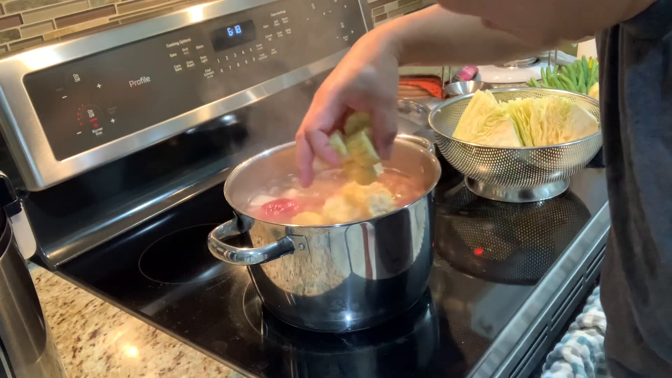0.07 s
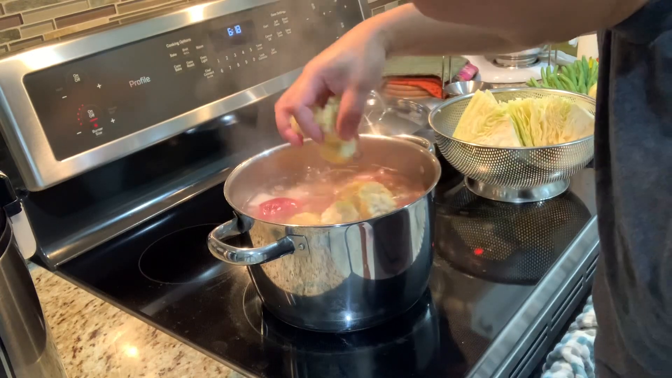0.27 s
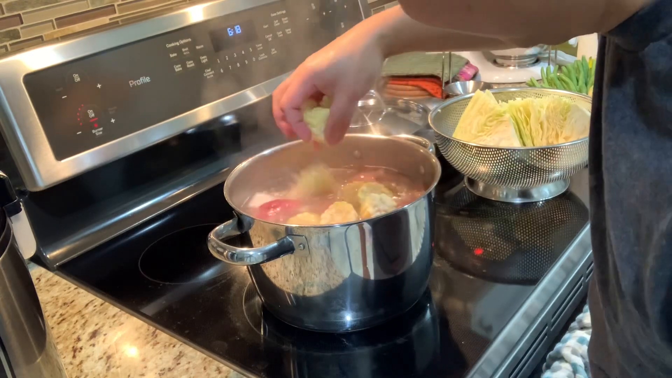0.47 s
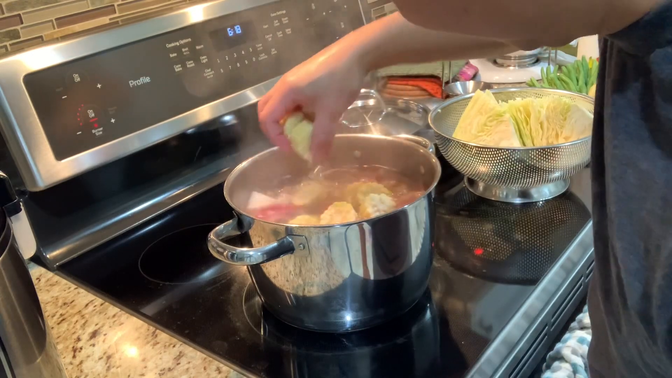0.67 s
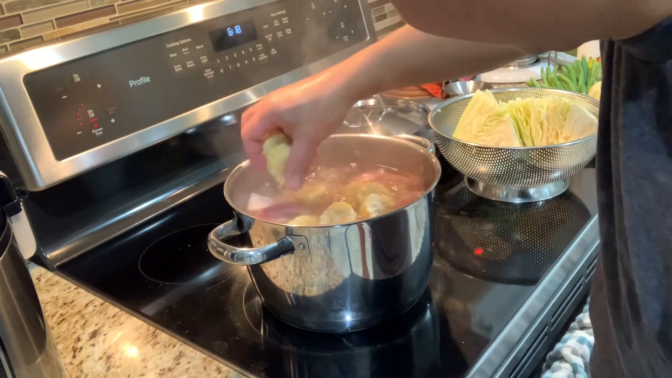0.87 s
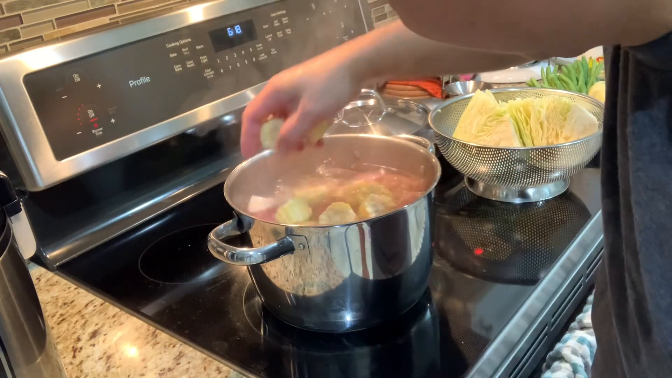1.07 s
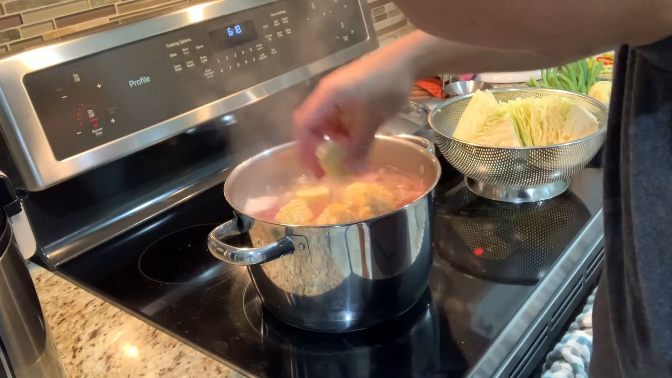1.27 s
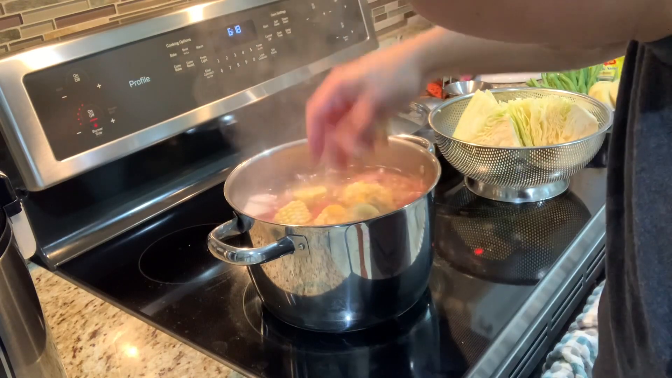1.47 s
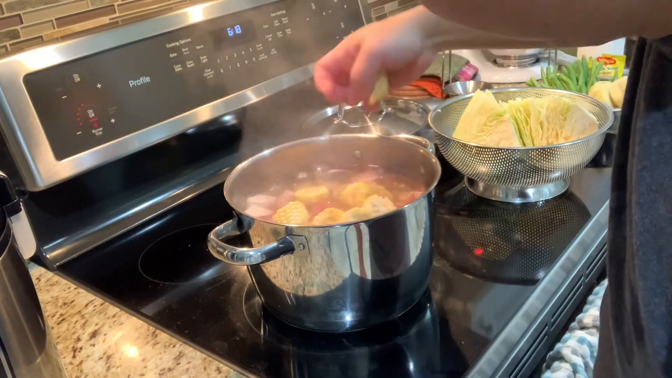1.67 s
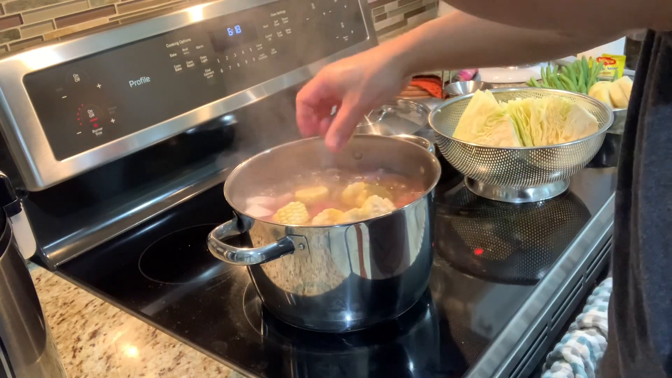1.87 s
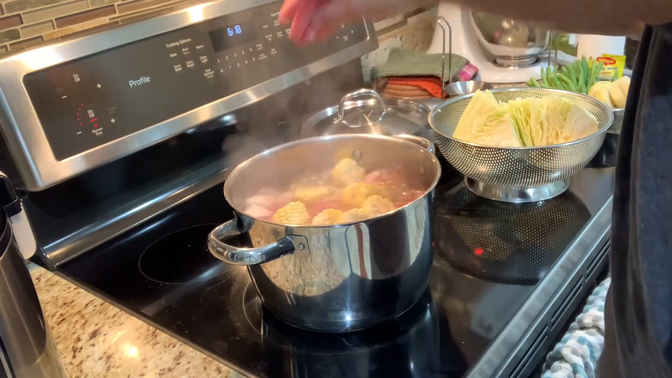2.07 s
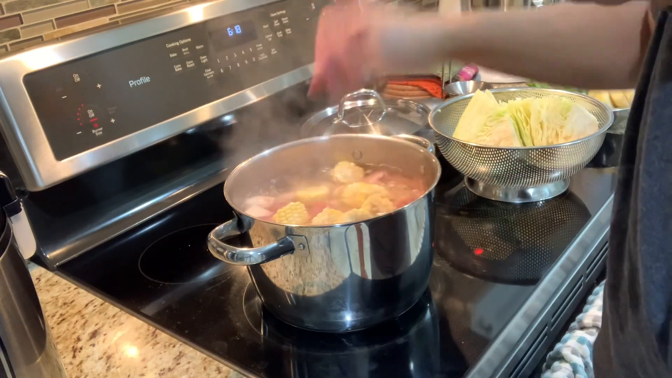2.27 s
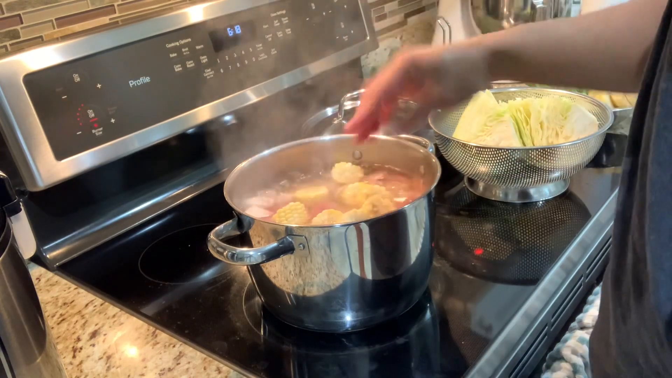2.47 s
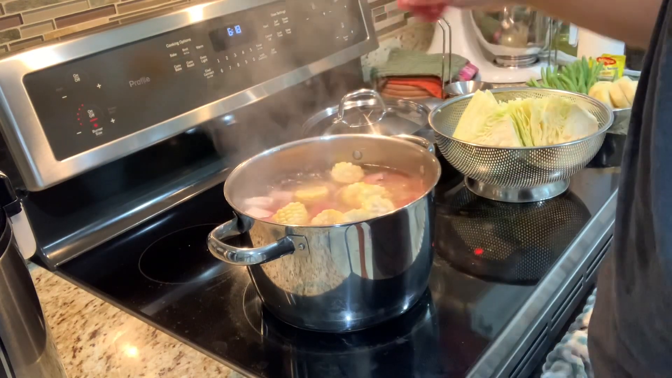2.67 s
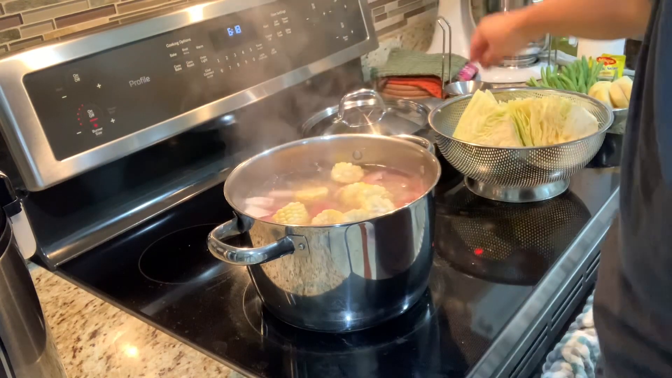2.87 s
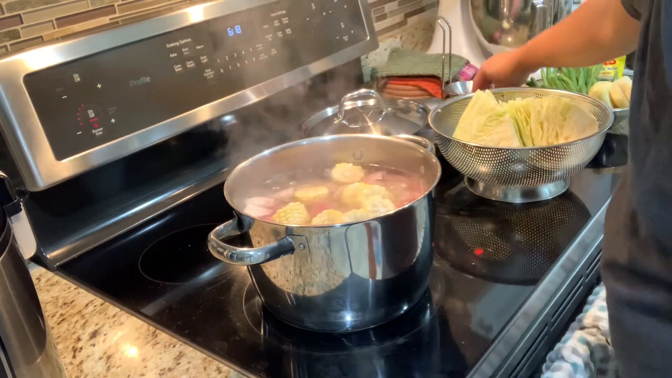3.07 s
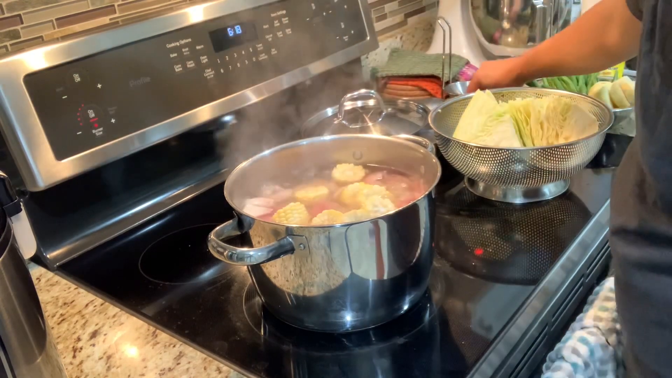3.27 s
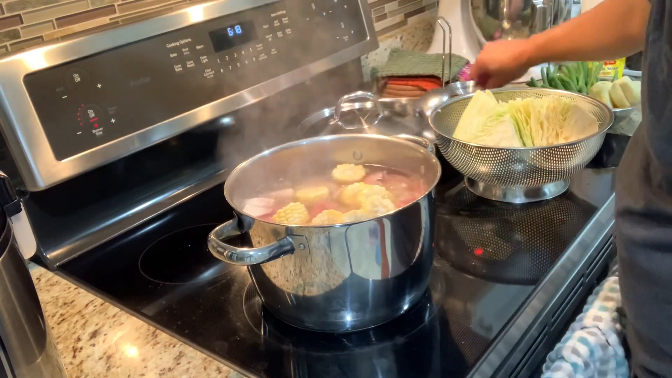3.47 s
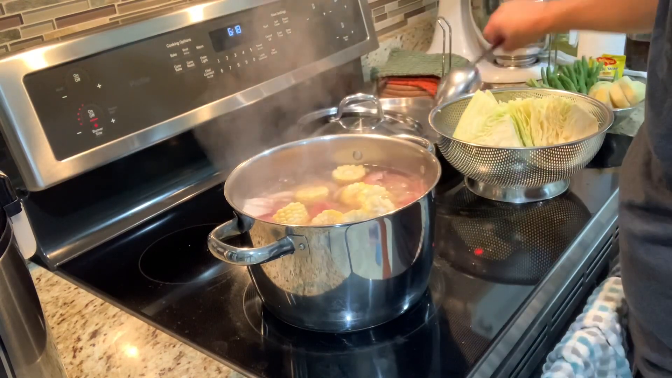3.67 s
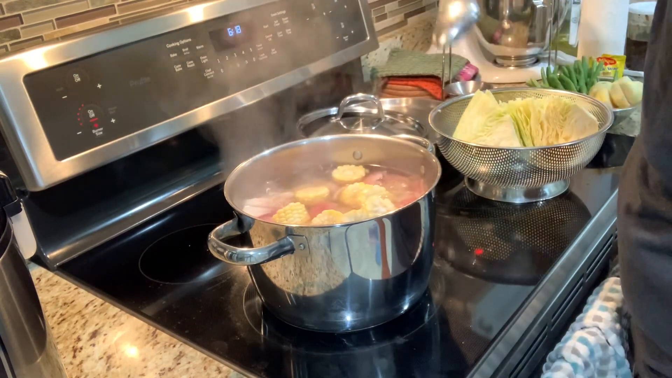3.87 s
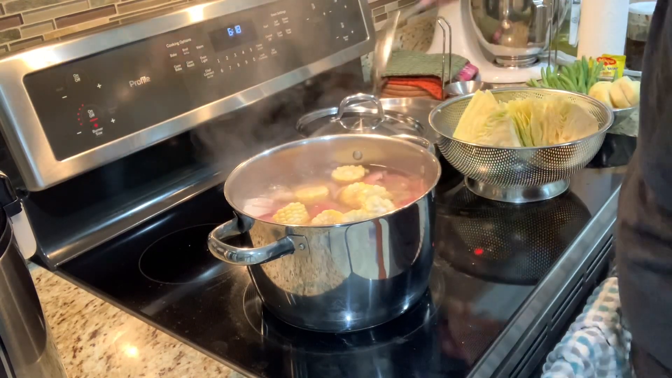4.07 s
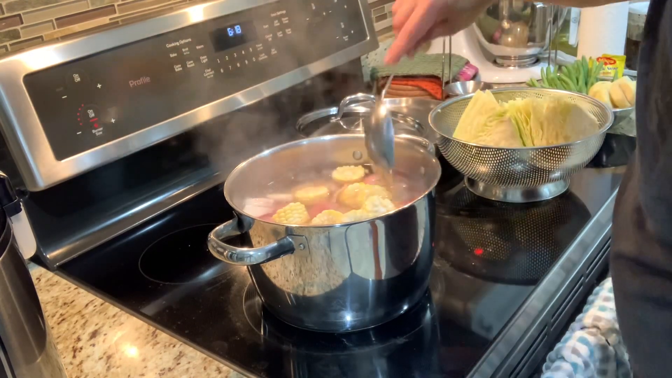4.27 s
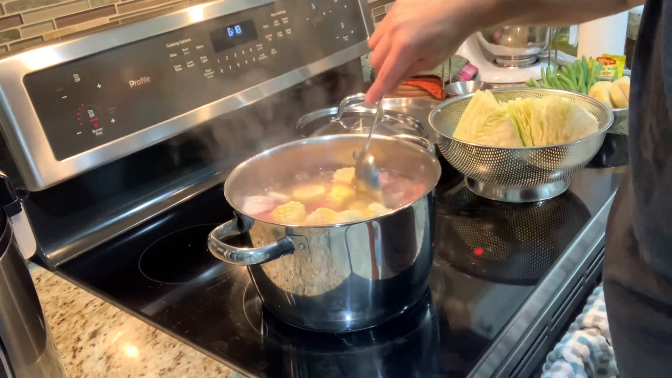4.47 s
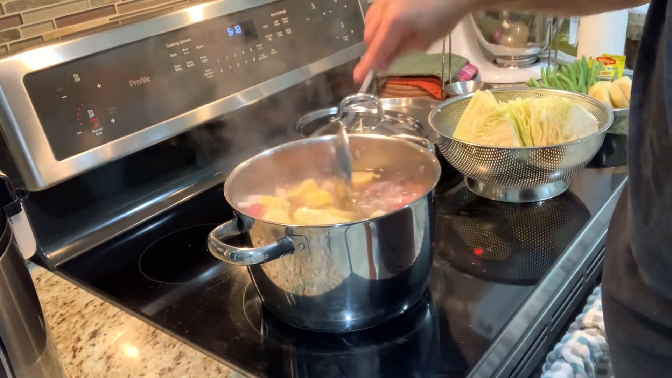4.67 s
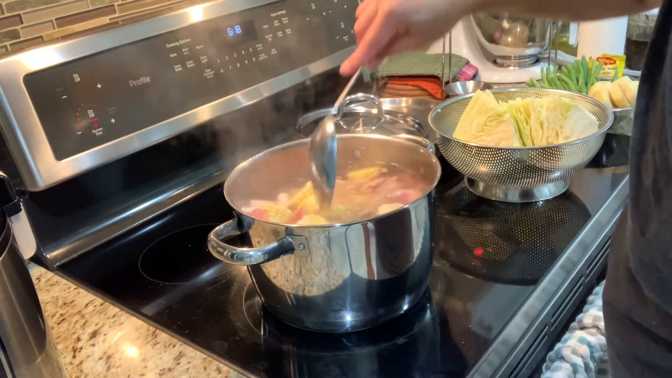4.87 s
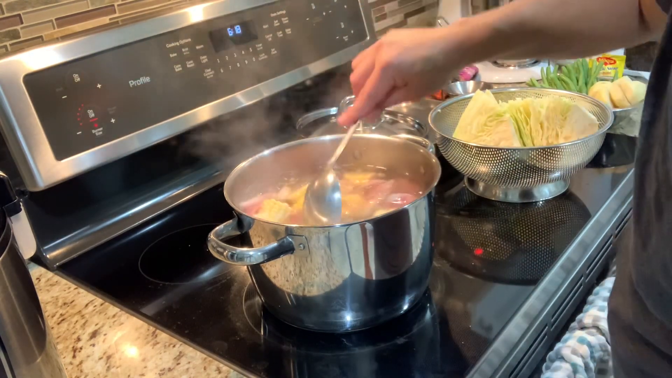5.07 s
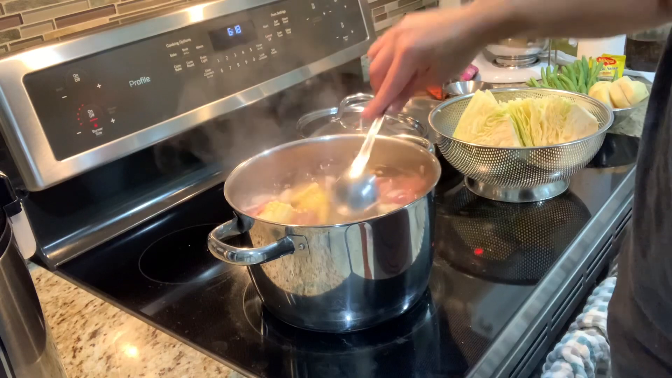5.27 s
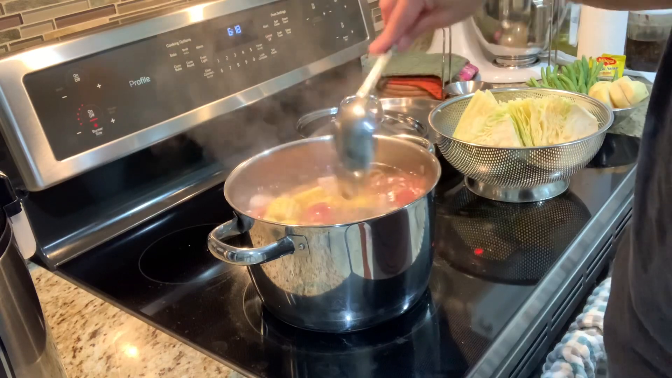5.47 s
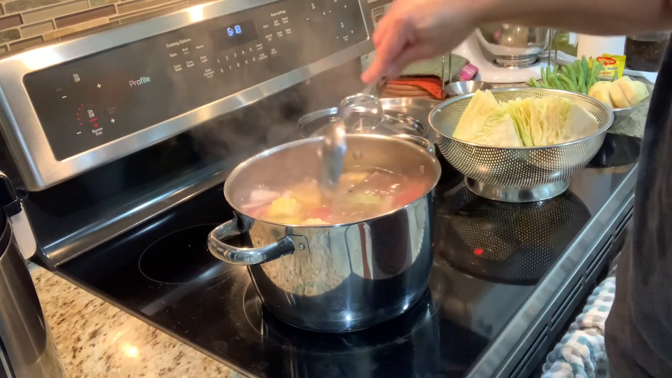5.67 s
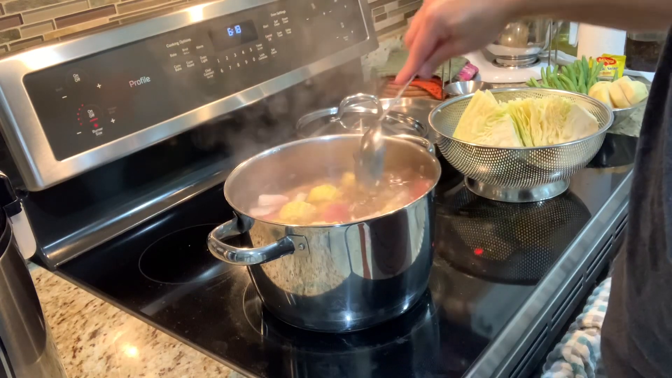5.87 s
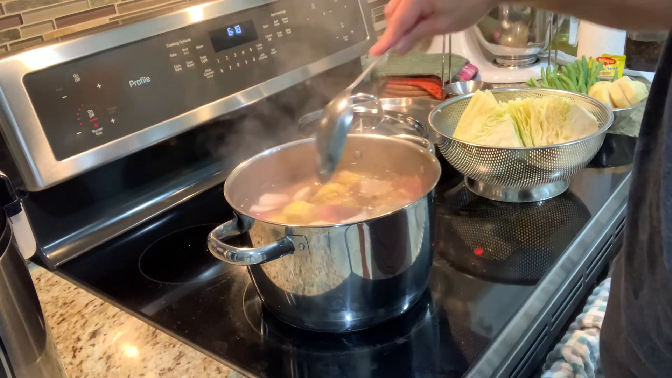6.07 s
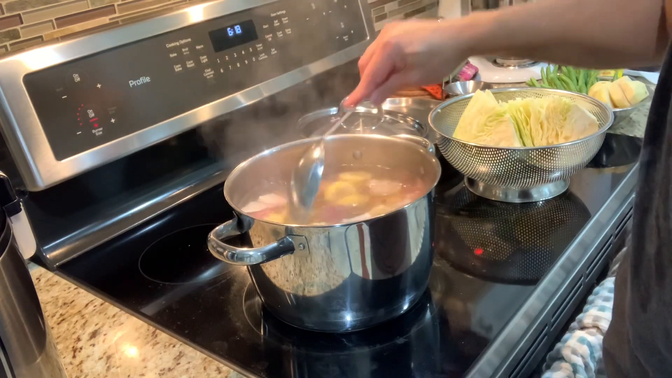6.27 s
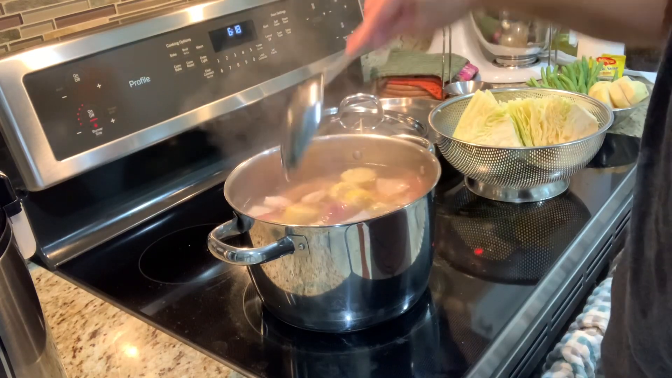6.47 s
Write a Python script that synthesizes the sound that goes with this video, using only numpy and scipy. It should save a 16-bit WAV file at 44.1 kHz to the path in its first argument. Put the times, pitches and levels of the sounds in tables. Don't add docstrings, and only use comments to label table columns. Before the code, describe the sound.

Close in a hard-walled kitchen, a pot of broth rolls softly with low rumble, fizz and tiny ticking bubbles. Corn pieces plop in with small splashes, strongest just before two seconds. A steel ladle then scrapes squealing along a stone counter and clatters very loudly, its brief ring echoing. Stirring follows with faint gurgles, drips and light splashes over a quiet appliance hum.

```python
import sys
import numpy as np
from scipy import signal
from scipy.fft import rfft, irfft, next_fast_len
from scipy.io import wavfile
from scipy.ndimage import uniform_filter1d

SR = 44100
rng = np.random.default_rng(int(sys.argv[2]) if len(sys.argv) > 2 else 0)


def attenuation_scalar(level_db):
    decades = np.asarray(level_db, float) / 20
    return 10 ** decades


def store_wav(level_fs):
    pcm = np.round(np.clip(np.atleast_2d(level_fs), -1, 1) * 32767)
    wavfile.write(sys.argv[1], SR, pcm.T.astype(np.int16))


N = 287158
T = np.arange(N) / SR

# pitch_hz [Hz], level_db [dB per Hz]
RUMBLE = [(12, -52), (20, -24), (49, 3), (92, -1), (141, 3.5), (157, 4.5), (173, -2), (265, -14),
          (461, -28.5), (500, -19), (650, -50.5), (1100, -120)]
SLOSH = [(120, -37.5), (200, -6.5), (269, 2), (402, -9.5), (507, -12), (878, -19.5), (2500, -36.5),
         (3250, -64), (5500, -120)]
PLUNGE = [(300, -15.5), (550, -4), (1100, 2.5), (2200, -1), (3300, -21), (5000, -59.5)]
SPRAY = [(1530, -22.5), (2600, -6), (2840, -4), (5050, -1.5), (6260, -4.5), (8000, -10.5), (10400, -11.5),
         (17600, -120)]
FIZZ = [(3530, -50), (6000, -5), (7900, -9), (10300, -3.5), (12700, -1.5), (14700, -6), (15400, -9.5),
        (16000, -21.5)]
# start_s [s], level_db [dB]
BOIL = [
    [(0.0, -58.5), (0.75, -70), (1.52, -67), (1.57, -76), (1.96, -61), (2.32, -64.5), (2.42, -59.5),
     (2.68, -72.5), (3.12, -66.5)],
    [(4.0, -80), (4.01, -68), (4.5, -62.5), (4.69, -75), (4.78, -60.5), (5.49, -69), (5.58, -60.5),
     (5.81, -71.5), (6.51, -64.5)],
]
# start_s [s], spray level_db [dB], mist_db above the spray [dB], depth_db [dB], t60_s [s]
SPLASHES = [(0.001, -66.5, -21, -5, 1), (0.3559, -50, 2, -3, 0.39), (0.431, -56.5, 0, -3, 0.22),
            (0.74, -68, -1, -8, 0.8), (0.8749, -52, -17, 1, 0.32), (0.937, -51.5, -6.5, 0, 0.23),
            (1.08, -54.5, -2.5, -33, 0.11), (1.335, -47.5, 1, -1.5, 0.15), (1.401, -55, 0, -9, 0.1),
            (1.726, -56.5, -8, 2, 0.12), (1.773, -53, 1.5, -2, 0.12), (1.842, -44.5, 2.5, -2, 0.26),
            (1.856, -42, 2, -2, 0.12), (1.924, -48.5, -1, -8.5, 0.21), (2.14, -74.5, 12, 5, 0.57),
            (2.443, -51.5, -18, -40, 0.061), (2.7, -55, -1.5, -11, 0.17), (2.7681, -62, -3, -31, 0.17),
            (2.191, -80, -15, 10.5, 0.73), (2.28, -76.5, -5, 2, 0.61), (2.8, -62, -17, -30, .2),
            (3.001, -60, -19, -4, 0.64), (3.024, -51, -17, -5, 0.6), (4.113, -63.5, 4.5, -15, 0.23),
            (4.1925, -64, 5.5, -14.5, 0.19), (4.265, -62, 0, -8, .2), (4.325, -58.5, -4, -8, 0.17),
            (4.363, -55.5, -6, -6, 0.25), (4.415, -62, -5, -9.5, .1), (5.1579, -55.5, -10.5, -23, 0.31),
            (5.368, -60.5, -27, -22.5, 0.32), (5.46, -59, -25.5, 3, 0.46), (5.5, -62, -27.5, 1, 0.28),
            (5.7007, -44.5, -3.5, -21, 0.24), (5.73, -58.5, 4, -7, 0.26), (5.847, -73.5, -20, 10.5, .15),
            (6.322, -70, 0, 0, 0.086)]
# start_s [s], level_db [dB]
FROTH = [
    (0.172, -52),
    (4.5168, -62.5),
    (4.7, -62.5),
    (4.7909, -53.5),
    (5.089, -62),
    (5.896, -58),
    (6.109, -60),
    (6.4192, -59),
]
# start_s [s], peak level_db [dB], pitch_hz [Hz]
TICKS = [(0.161, -56, 10500), (0.1805, -49.5, 14000), (0.191, -47.5, 13700), (0.255, -48, 10400),
         (0.3594, -36, 13360), (0.4299, -48, 10600), (0.5506, -49, 12860), (0.6615, -50, 11900),
         (0.7377, -52, 12200), (0.7592, -48, 13800), (0.7934, -53, 9370), (0.8124, -46.5, 11200),
         (0.831, -50.5, 13280), (0.9098, -51, 5290), (0.9453, -46, 6780), (0.9704, -41.5, 10300),
         (1.0246, -50.5, 14000), (1.0369, -43.5, 10400), (1.0819, -44, 11600), (1.1136, -47, 12400),
         (1.2137, -53, 8050), (1.2511, -55, 12900), (1.3293, -53, 11040), (1.3389, -46, 5600),
         (1.338, -43, 11500), (1.4032, -46.5, 6230), (1.4771, -52, 13000), (1.5783, -53.5, 13800),
         (1.6063, -57, 13300), (1.6187, -53, 12000), (1.6751, -45.5, 11900), (1.709, -45, 10000),
         (1.7445, -41.5, 12900), (1.7755, -36, 13290), (1.8442, -38, 11000), (1.8587, -39, 13100),
         (1.8583, -31, 6660), (1.9258, -39.5, 6400), (2.0577, -64, 13200), (2.0717, -47, 11600),
         (2.1032, -50.5, 10600), (2.12, -48.5, 12900), (2.1432, -48, 11400), (2.173, -53.5, 12200),
         (2.2248, -51.5, 11800), (2.2982, -58, 11700), (2.2986, -54.5, 12700), (2.3521, -50.5, 14250),
         (2.4543, -61, 9450), (2.4543, -47, 10400), (2.614, -72, 9270), (2.614, -52, 13300),
         (2.6468, -51, 12670), (2.7077, -60, 13800), (2.7097, -53, 13290), (2.7697, -48.5, 9400),
         (2.837, -49, 8480), (2.9986, -57, 12810), (3.026, -51, 5047), (3.1162, -46.5, 12030)]
# start_s [s], peak level_db [dB], pitch_hz [Hz]
STIR_TICKS = [(4.1172, -59.5, 8330), (4.1691, -58, 12600), (4.1947, -52, 10500), (4.2403, -58, 10300),
              (4.3357, -51, 12720), (4.363, -52, 5590), (4.4224, -56, 11300), (4.5155, -50.5, 10400),
              (4.545, -46, 10790), (4.6615, -48, 12610), (4.702, -54, 12480), (4.7884, -48.5, 12200),
              (4.838, -55, 11270), (5.0426, -51.5, 5990), (5.076, -63, 8150), (5.089, -52.5, 14500),
              (5.1025, -50.5, 14250), (5.142, -56.5, 13900), (5.1593, -56, 5520), (5.1692, -52, 10700),
              (5.2027, -53, 5130), (5.2361, -48, 12040), (5.3474, -58, 11900), (5.433, -52, 8180),
              (5.5045, -52, 9740), (5.546, -53.5, 10000), (5.7011, -33, 11000), (5.808, -54, 13500),
              (5.8946, -52, 13300), (5.9258, -53, 13760), (6.1082, -55, 10480), (6.153, -54, 14100),
              (6.2899, -65, 13000), (6.3238, -48.5, 12900), (6.4183, -52, 8230), (6.4433, -53, 12600)]
# start_s [s], peak level_db [dB], pitch_hz [Hz]
PLOPS = [(0.021, -50.5, 543), (0.359, -48.5, 1120), (0.434, -47, 990), (0.47, -49.5, 1030),
         (0.58, -51, 3610), (0.639, -58, 1420), (0.74, -49, 3820), (0.786, -58.5, 1790), (0.875, -36, 1360),
         (0.938, -45, 1310), (1.07, -49.5, 4030), (1.337, -57, 830), (1.726, -48.5, 1460),
         (1.776, -60, 1690), (1.799, -49, 3800), (1.846, -44, 1080), (1.926, -48, 1610), (2.017, -51, 3970),
         (2.087, -52, 3260), (2.153, -56, 1180), (2.176, -52.5, 610), (2.287, -60, 666), (2.406, -58, 606),
         (3.003, -58, 1224), (3.03, -45.5, 660), (0.504, -55.5, 700), (.535, -57, 1020), (0.401, -53, 1700),
         (2.191, -66, 1340), (2.23, -56.5, 1000), (2.26, -61, 820), (2.291, -51, 4040), (2.34, -62, 700),
         (2.408, -49, 3750), (2.444, -53, 4500), (.91, -54, 3460), (.965, -58, 1860), (1.86, -44.5, 1870),
         (1.88, -47, 1480), (3.046, -42, 3695)]
# start_s [s], peak level_db [dB], pitch_hz [Hz]
DRIPS = [(4.299, -60.5, 663), (4.484, -57, 606), (4.906, -60.5, 1228), (5.043, -65.5, 683),
         (5.139, -62, 2560), (5.295, -55, 3140), (5.368, -45, 4064), (5.463, -55, 1200), (5.625, -57, 2720),
         (5.702, -56, 3307), (5.731, -52, 3300), (5.849, -51, 988), (5.467, -52, 3200), (5.49, -53, 1992),
         (5.499, -56, 1297), (5.312, -60, 1300), (5.851, -56, 1580), (4.36, -60, 667), (6.332, -58, 1200),
         (5.373, -49, 3770), (5.385, -55, 4200), (5.627, -57, 3900), (5.478, -51.5, 1248),
         (5.515, -60, 1280), (5.529, -57, 1250), (5.505, -54, 2000), (5.525, -60, 2890), (5.586, -62, 1290),
         (5.702, -57, 1500), (5.87, -63, 1005)]
# start_s [s], peak level_db [dB], pitch_hz [Hz]
GULPS = [(1.969, -53, 152), (2.419, -47, 152), (2.858, -55.5, 149), (4.344, -43, 91.7), (4.369, -43, 195),
         (4.394, -46, 142.9), (4.484, -50, 168.4), (4.77, -49, 130), (5.545, -54, 129), (5.574, -51, 91.5),
         (5.609, -46, 112), (5.994, -45, 153), (6.029, -47, 140)]
# start_s [s], pressure level_db [dB], chatter pitch_hz [Hz]
DRAG = [(3.132, -73, 814), (3.159, -56, 814.3), (3.215, -48, 755.3), (3.24, -54.5, 795),
        (3.325, -45.5, 795), (3.345, -42, 744.4), (3.364, -38, 740), (3.388, -38.5, 760), (3.4, -31, 758),
        (3.43, -34, 746.3), (3.468, -47, 737)]
# start_s [s], peak level_db [dB]
BLOWS = [
    (3.470, -12),
    (3.478, -14.5),
    (3.489, -12.5),
    (3.4993, -12),
]
# start_s [s], handle level_db [dB], grit level_db above the bowl [dB]
STAGES = [
    (3.132, -10.5, -13),
    (3.349, -14.5, 10),
    (3.387, -10.5, -2),
    (3.464, -9.5, 2),
    (3.497, -12, -5),
    (3.52, -5, -7.5),
]
# start_s [s], length_s [s], peak level_db [dB], pitch_hz [Hz]
SQUEALS = [(3.172, .065, -56, 1650), (3.193, 0.055, -51, 1410), (3.202, 0.13, -58, 802.6),
           (3.309, 0.027, -52, 1470), (3.338, 0.037, -43, 1470), (3.395, 0.044, -39.5, 745),
           (3.4, 0.049, -32.5, 1650), (3.4712, 0.0045, -23, 1560), (3.483, 0.012, -15.5, 1640),
           (3.494, 0.0048, -16.5, 1540), (3.5005, 0.0102, -12, 1610), (3.52, 0.025, -27, 1620),
           (3.549, .016, -26.5, 1560), (3.571, 0.047, -42, 608)]
# pitch_hz [Hz], level_db [dB], t60_s [s]
BOWL = [(1418, -6.5, 0.11), (1525, -6.5, 0.12), (1580, -8, 0.056), (1682, -6, 0.07)]
HANDLE = [(433.8, -3.5, 0.2), (555, -12.5, 0.27), (626, -4.5, 0.35)]
RIM = [(3516, -5.5, .1), (4120, -6, .04), (4848, -14, 0.2), (5720, -11, 0.1), (6160, -4.5, 0.046),
       (6560, -10.5, 0.049), (8150, -8.5, .04), (9630, -9, .04), (11460, -4.5, .04)]
# pitch_hz [Hz], level_db [dB], t60_s [s]
STRUCK = [(1210, -4.5, 0.077), (1945, -1, 0.11), (2060, -8.5, .2), (2243, -10, .1), (867, -10.5, .1),
          (2835, -13.5, 0.25), (3280, -20.5, .2), (3890, -23, 0.5), (4613, -21, .42), (4520, -22, .3),
          (4660, -21, .3), (1453, -13, .4), (1545, -12, .4), (4840, -21.5, .4), (3480, -12, .2),
          (1012, -16, .04), (5100, -19.5, .3)]
# multiple [of chatter rate], level_db [dB], t60_s [s]
CHATTER = [(1, 1, 0.03), (2, 3.5, 0.024), (4, -15, .02), (5, -14, 0.06), (7, -21.5, 0.022)]
# pitch_hz [Hz], level_db [dB per Hz]
GRIT = [(1060, -37), (1800, -4.5), (2640, -7.5), (3200, -7), (5060, -8), (6420, -7), (7560, -12.5),
        (8210, -8.5), (13600, -10.5), (14900, -15.5), (16000, -85)]
# start_s [s], pitch_hz [Hz], level_db [dB]
SWING = [
    (3.88, 11140, -101),
    (3.946, 11600, -76),
    (4.15, 10900, -97),
]
# pitch_hz [Hz], t60_s [s], level_db [dB]
KITCHEN = [(89.54, 1, 4), (253, 0.59, 0), (700, 0.49, 6.5), (1700, 0.42, -6), (3200, 0.62, -0.5),
           (4970, 0.49, 2), (8766, 0.27, 7)]
# pitch_hz [Hz], level_db [dB per Hz]
HUSH = [(180, -36), (300, -7), (900, -18.5), (994, -14), (1810, -21), (2250, -18.5), (2700, -21.5),
        (3830, -17), (7320, -25.5), (10600, -27), (12900, -22), (14700, -19), (16000, -47.5)]
# pitch_hz [Hz], level_db [dB]
HUMS = [(150.7, -73.5), (1297, -97), (2218, -93.5)]
# pitch_hz [Hz], threshold level_db above the band's quiet level [dB]
GATE = [(2500, -25), (3500, -3.5), (6500, -3), (7500, .6), (8300, -3), (13500, -3.5), (14800, 2.5),
        (16000, 8)]

CALM_DB, RUMBLE_DB, SLOSH_DB, FIZZ_DB = -65.5, -67, -76.5, -83.5
RUMBLE_FOLLOWS, SLOSH_FOLLOWS, FIZZ_FOLLOWS = 0.71, 1, 0.1
SPLASH_RISE_S, CLUMP_DB, CLUMPS_PER_S = 0.0043, 3.5, 35
FROTH_S, PUFF_DB, PUFF_S = 0.16, -18.5, 0.049
TICK_RING_S, PLOP_RING_S, DRIP_RING_S, GULP_RING_S = 0.0015, 0.012, 0.0144, 0.04
TICK_LATE_S, TICK_UNDER, TICK_UNDER_DB = 0.00064, 0.58, -11
SMALL_TICKS, SMALL_DB, SMALL_SCATTER_DB = 60, -63.5, 3
SMALL_HZ, SMALL_SPREAD = 13800, 0.6
DROPLETS, DROPLET_DB, DROPLET_HZ = 5, -0.5, 1700
DROPLET_SPREAD, FALL_SHARE, DROPLET_RING_S = 0.24, 0.41, 0.01
BLUBS, BLUB_DB, BLUB_SCATTER_DB = 35, -67, 4
BLUB_HZ, BLUB_OCTAVES, BLUB_RING_S = 280, 1.4, 0.022
DUCK_FROM_S, DUCK_TO_S, DUCK_DB = 3.13, 4.1, -4
RATTLE_DB, RATTLE_RISE_S, RATTLE_S, RATTLE_HZ = -7, 0.0036, 0.01, 787.3
BOUNCE_DB, BOUNCE_FROM_S, BOUNCE_GAP_S, BOUNCE_T60_S = -23.5, 3.512, 0.034, 0.18
STAGE_BLEND_S, CHATTER_WOBBLE = 0.033, 0.04694
SQUEAL_PEAKS_AT, SQUEAL_WAVER, SQUEAL_ROUGH_DB = 0.3, 0.008, 3
HUSH_DB = -81.5
PORT_LAG = 4


def pot(ticks):
    vigour_db = np.interp(T, *np.transpose(np.vstack(BOIL))) - CALM_DB
    start_s, spray_db, mist_db, depth_db, t60_s = np.transpose(SPLASHES)
    froth = splash(*np.transpose(FROTH), np.full(len(FROTH), FROTH_S), rise_s=0.012)
    tick_s, tick_db, _ = np.transpose(ticks)
    puffs = splash(tick_s, tick_db + PUFF_DB, np.full(len(tick_s), PUFF_S))
    clumps = attenuation_scalar(CLUMP_DB * walk(CLUMPS_PER_S))

    out = spread(RUMBLE, 0.3, 0.98, 0, 1.6, 16.12) * attenuation_scalar(RUMBLE_DB + RUMBLE_FOLLOWS * vigour_db)
    slosh = attenuation_scalar(SLOSH_DB + SLOSH_FOLLOWS * vigour_db + 2.5 * walk(5.4))
    heave = splash(start_s, spray_db + depth_db - 16, 1.5 * t60_s, 0.023) * clumps
    out += spread(SLOSH, 0.47, 0.13, 1.5, 1.6, 13) * np.hypot(slosh, heave)
    plunge = splash(start_s, spray_db + depth_db - 10.5, 0.93 * t60_s, 0.0048) * clumps
    out += spread(PLUNGE, 0.65, 0.035, 2.4, 1.7, 50) * plunge
    spray = splash(start_s, spray_db - 13.5, 1.1 * t60_s, SPLASH_RISE_S) * clumps
    out += spread(SPRAY, 0.79, 0.16, 1.3, 2.284, 60) * spray
    fizz = attenuation_scalar(FIZZ_DB + FIZZ_FOLLOWS * vigour_db + 1.7 * walk(19)) * ducked()
    mist = splash(start_s, spray_db + mist_db - 7, 0.4 * t60_s, SPLASH_RISE_S) * clumps
    mist = np.hypot(mist, attenuation_scalar(-7.5) * froth)
    out += spread(FIZZ, 0.3, 0.2, 3.3, 3, 18) * np.sqrt(fizz ** 2 + mist ** 2 + puffs ** 2)
    return out


def splash(times, dbs, t60s, rise_s=0.0022):
    power, t = np.zeros(N + SR), T[:SR // 2]
    for start_s, db, t60 in zip(times, dbs, t60s):
        i = int(start_s * SR)
        swell = attenuation_scalar(db - 60 * t / max(t60, 0.01)) * np.minimum(t / rise_s, 1)
        power[i:i + len(t)] += swell ** 2
    return np.sqrt(power[:N])


def ducked():
    return attenuation_scalar(DUCK_DB * ((T > DUCK_FROM_S) & (T < DUCK_TO_S)))


def bubbles(ticks):
    voices = [(s + TICK_LATE_S, db + 5, hz, TICK_RING_S) for s, db, hz in ticks]
    voices += [(s, db + TICK_UNDER_DB, hz * TICK_UNDER, ring_s) for s, db, hz, ring_s in voices]
    drops = [(*row, PLOP_RING_S) for row in PLOPS]
    drops += [(*row, DRIP_RING_S) for row in DRIPS]
    drops += droplets() + blubs()
    drops = [(s, db, hz, t60 * min(1, (1500 / hz) ** 0.597)) for s, db, hz, t60 in drops]
    gulps = [(*row, GULP_RING_S) for row in GULPS]
    out = pings(gulps, glide=0.1, rise_s=0.0036, rough=0, wobble=0.6, pan_db=1.5)
    out += pings(voices, glide=0.033, rise_s=0.00004, rough=0.13, wobble=0.34, pan_db=0.23)
    out += pings(drops, glide=0.044, rise_s=0.00055, rough=0.04, wobble=1.5, pan_db=-8.5)
    return out


def bursts():
    when, size, pitch = rng.random((SMALL_TICKS, 3)).T
    start_s = when * (N - 1) / SR
    level_db = SMALL_DB - SMALL_SCATTER_DB * np.log(0.087 + size)
    pitch_hz = np.clip(SMALL_HZ * np.exp(-SMALL_SPREAD * pitch ** 2.2), 4000, 14800)
    small = [row for row in zip(start_s, level_db, pitch_hz) if not DUCK_FROM_S < row[0] < DUCK_TO_S]
    return list(TICKS) + list(STIR_TICKS) + small


def droplets():
    rows = []
    for start_s, db, _, depth_db, t60 in SPLASHES:
        for late, pitch in rng.random((DROPLETS, 2)):
            after = late * FALL_SHARE * t60
            hz = DROPLET_HZ * np.exp(DROPLET_SPREAD * (2 * pitch - 1) * 0.87)
            level_db = db + depth_db + DROPLET_DB - 40 * after / t60
            rows.append((start_s + after, level_db, hz, DROPLET_RING_S))
    return rows


def blubs():
    when, size, pitch = rng.random((BLUBS, 3)).T
    start_s = when * (N - 1) / SR
    level_db = BLUB_DB + BLUB_SCATTER_DB * size
    pitch_hz = BLUB_HZ * 2 ** (BLUB_OCTAVES * pitch)
    return [(*row, BLUB_RING_S) for row in zip(start_s, level_db, pitch_hz)]


def pings(rows, glide, rise_s, rough, wobble, pan_db):
    out = np.zeros((2, N + SR))
    for start_s, db, hz, t60 in rows:
        t60 = max(t60, 1e-3)
        t = T[:int(1.5 * t60 * SR)]
        chance = rng.standard_normal(SR // 16)[:len(t)]
        tone = np.sin(2 * np.pi * hz * t * (1 + glide * np.minimum(t / t60, 1)))
        tone = tone * (1 + wobble * uniform_filter1d(chance, size=30)) + rough * chance
        tone = tone * attenuation_scalar(db - 60 * t / t60) * (1 - np.exp(-t / rise_s))
        i = int(start_s * SR)
        out[:, i:i + len(t)] += ports(tone, pan_db + 2.1 * chance[0])
    return out[:, :N]


def ladle():
    heard = slice(3 * SR, 5 * SR)
    t = T[heard]
    force, handle_db, grit_db, chatter_hz = contact(t)
    slips = level(grains(0.035, 2.9))[heard] * force
    blows = np.zeros(N)
    for start_s, db in BLOWS:
        blows[int(start_s * SR)] = attenuation_scalar(db + 15)
    blows = uniform_filter1d(uniform_filter1d(blows[heard], size=9), size=9) + 1e-12

    body = steel_body(t, slips, blows, handle_db, chatter_hz) + counter(t, slips, blows)
    grit = spread(GRIT, 0.45, 0.25, 2.3, 2.8, 120)[:, heard] * force * attenuation_scalar(grit_db - 3.5)
    grit += ports(ring(attenuation_scalar(-5.5) * slips * attenuation_scalar(grit_db), RIM))
    grit[1] = np.roll(grit[1], PORT_LAG)
    top = signal.ellip(8, 0.5, 60, 14900, fs=SR, output="sos")
    steel, squeal = np.zeros((2, N)), np.zeros(N)
    steel[:, heard] = signal.sosfilt(top, ports(body, -1.2) + grit)
    squeal[heard] = squeals(t)
    return steel, squeal


def contact(t):
    start_s, press_db, hz = np.transpose(DRAG)
    force = attenuation_scalar(np.interp(t, start_s, press_db)) * ((t > start_s[0]) & (t < start_s[-1]))
    ends = [at for at, _ in BLOWS[1:]] + [BLOWS[-1][0] + RATTLE_S]
    for (at, db), end in zip(BLOWS, ends):
        force = force + attenuation_scalar(db + RATTLE_DB) * np.clip((t - at) / RATTLE_RISE_S, 0, 1) * (t < end)
    rest = np.maximum(t - BOUNCE_FROM_S, 0)
    rocking = np.sin(np.pi * rest / BOUNCE_GAP_S) ** 2
    force = force + attenuation_scalar(BOUNCE_DB - 60 * rest / BOUNCE_T60_S) * rocking
    stage_s, handle_db, grit_db = np.transpose(STAGES)
    stage = np.clip(np.searchsorted(stage_s, t) - 1, 0, None)
    blend = int(STAGE_BLEND_S * SR)
    handle_db = uniform_filter1d(handle_db[stage], blend)
    grit_db = uniform_filter1d(grit_db[stage], blend)
    chatter_hz = np.interp(t, start_s, hz, right=RATTLE_HZ) * (1 + CHATTER_WOBBLE * walk(70)[:len(t)])
    return force + 1e-12, handle_db, grit_db, chatter_hz


def steel_body(t, slips, blows, handle_db, chatter_hz):
    out = ring(attenuation_scalar(-8) * slips + blows, BOWL)
    out += ring(attenuation_scalar(-4.5) * slips * (t > BLOWS[0][0]) + blows, STRUCK)
    out += chatter(attenuation_scalar(-5) * slips + blows, chatter_hz, CHATTER[1:])
    out += chatter(attenuation_scalar(0.5) * slips * attenuation_scalar(handle_db), chatter_hz, CHATTER[:1])
    out += ring(attenuation_scalar(-6.5) * slips * attenuation_scalar(handle_db) + attenuation_scalar(-6.5) * blows, HANDLE)
    return signal.sosfilt(signal.butter(8, 380, "high", fs=SR, output="sos"), out)


def counter(t, slips, blows):
    thump = ring(blows, [(62.02, -2, 0.2), (187, 3, 0.038)])
    thump = signal.sosfilt(signal.butter(2, 45, "high", fs=SR, output="sos"), thump)
    hum = ring(slips * (t < STAGES[1][0]), [(140, 0.01, 0.08), (240.3, 0.00073, 0.06)])
    return attenuation_scalar(-14.5) * thump + attenuation_scalar(-10.5) * hum


def chatter(x, hz, orders):
    out = 0
    for k, db, t60 in orders:
        r = np.exp(-np.log(1000) / (t60 * SR))
        turn = np.exp(2j * np.pi * k * np.cumsum(hz) / SR)
        out = out + attenuation_scalar(db) * np.sqrt(1 - r) * (turn * signal.lfilter([1], [1, -r], x / turn)).imag
    return out


def squeals(t):
    waver = walk(60)[:len(t)]
    rough = attenuation_scalar(SQUEAL_ROUGH_DB * walk(150)[:len(t)])
    bend = np.log(0.5) / np.log(SQUEAL_PEAKS_AT)
    out = 0
    for start_s, length_s, db, hz in SQUEALS:
        share = np.clip((t - start_s) / length_s, 0, 1)
        shape = np.sin(np.pi * share ** bend) ** 0.55
        out = out + attenuation_scalar(db) * shape * np.sin(2 * np.pi * hz * np.cumsum(1 + SQUEAL_WAVER * waver) / SR)
    return out * rough


def swing():
    start_s, hz, db = np.transpose(SWING)
    gain = attenuation_scalar(np.interp(T, start_s, db, -130, -130) + 3 + 6.2 * walk(50))
    pitch_hz = np.interp(T, start_s, hz) + 90 * walk(90)
    return ports(gain * np.sin(2 * np.pi * np.cumsum(pitch_hz) / SR))


def kitchen(x):
    t = T[:SR]
    tail = 0
    for hz, t60, db in KITCHEN:
        band = signal.butter(2, [hz / 1.7, min(hz * 1.7, 20000)], "band", fs=SR, output="sos")
        noise = rng.standard_normal((3, SR))
        alike = np.clip(400 / hz, 0, 1.5)
        both = (alike * noise[2] + noise[:2]) / np.sqrt(1 + alike ** 2)
        tail = tail + signal.sosfilt(band, both) * attenuation_scalar(db - 60 * t / t60)
    tail = tail * np.clip((t - 0.004) / 0.0034, 0, 1) / np.sqrt(SR / 20)
    return signal.fftconvolve(x[None], tail, axes=1)[:, :N]


def stove():
    hums = 0
    for hz, db in HUMS:
        gain = attenuation_scalar(db + 3.4 * walk(7.5))
        hums = hums + gain * np.sin(2 * np.pi * hz * T + 0.39 * walk(6.6))
    return spread(HUSH, 0.79, 0.55, 1.5, 1.3, 14) * attenuation_scalar(HUSH_DB) + ports(hums)


def spread(points, side, share, scatter_db, flicker_db, rate):
    mid, other = (level(colour(grains(share, scatter_db), points)) for _ in range(2))
    return (ports(mid) + side * other * np.array([[1], [-1]])) * attenuation_scalar(flicker_db * walk(rate))


def grains(share, scatter_db):
    sparse = rng.standard_normal(N) * (rng.random(N) < share)
    size_db = scatter_db * np.minimum(rng.exponential(size=N), 4.5)
    return sparse * attenuation_scalar(size_db)


def colour(x, points):
    hz, db = np.transpose(points)
    n = next_fast_len(N)
    log_hz = np.log(np.maximum(np.arange(n // 2 + 1) * SR / n, 1))
    return irfft(rfft(x, n) * attenuation_scalar(np.interp(log_hz, np.log(hz), db)), n)[..., :N]


def level(x, db=0):
    return x * attenuation_scalar(db) / np.sqrt(np.mean(x ** 2))


def walk(rate):
    k = int(SR / rate)
    steps = np.repeat(rng.standard_normal(N // k + 1), k)
    return uniform_filter1d(uniform_filter1d(steps, k), k)[:N]


def ring(x, modes):
    out = 0
    for hz, db, t60 in modes:
        r = np.exp(-np.log(1000) / (t60 * SR))
        w = 2 * np.pi * hz / SR
        mode = signal.lfilter([1], [1, -2 * r * np.cos(w), r * r], x)
        out = out + attenuation_scalar(db) * np.sqrt(1 - r) * np.sin(w) * mode
    return out


def ports(x, pan_db=0):
    return np.array([x * attenuation_scalar(pan_db / 2), x * attenuation_scalar(-pan_db / 2)])


def from_right(x, lean_db, fade_hz):
    n = next_fast_len(N)
    hz = np.arange(n // 2 + 1) * SR / n
    low = 1 / (1 + (hz / fade_hz) ** 2)
    delay = np.exp(-2j * np.pi * hz * PORT_LAG / SR)
    left = irfft(rfft(x[0], n) * attenuation_scalar(lean_db * low) * delay, n)
    return np.array([left[:N], x[1]])


def scene():
    ticks = bursts()
    steel, squeal = ladle()
    water = bubbles(ticks)
    walls = kitchen(attenuation_scalar(-3) * steel[1] + attenuation_scalar(-9) * squeal + attenuation_scalar(-8) * water.mean(axis=0))
    counter_side = steel + ports(squeal, -1.2) + walls + swing()
    stove_side = from_right(water + pot(ticks) + stove(), lean_db=0.92, fade_hz=6200)
    return counter_side + stove_side


def top_cut(x):
    return signal.sosfilt(signal.butter(12, 16160, fs=SR, output="sos"), x)


def record(dry):
    hz, _, z = signal.stft(np.tanh(dry * 0.69) / 0.54, SR, nperseg=1024)
    edges = np.arange(0, len(hz), 12)
    power = np.add.reduceat(np.abs(z.mean(axis=0)) ** 2, edges, axis=0)
    band_db = 10 * np.log10(uniform_filter1d(power, size=2, axis=1) + 1e-30)
    quiet_db = np.sort(band_db)[:, [band_db.shape[1] // 6]]
    threshold_db = np.interp(hz[edges], *np.transpose(GATE))[:, None]
    above_db = band_db - quiet_db - threshold_db
    keep = np.repeat(np.clip(0.5 + above_db / 2.2, 0.08, 1), 12, axis=0)[:len(hz)]
    mix = signal.istft(z * keep, SR, nperseg=1024)[1][:, :N]
    return top_cut(mix)


dry = scene()
out = record(dry)
store_wav(out)
```